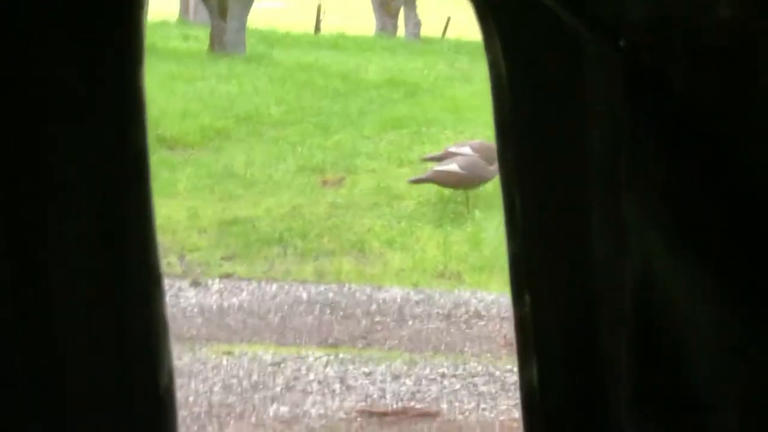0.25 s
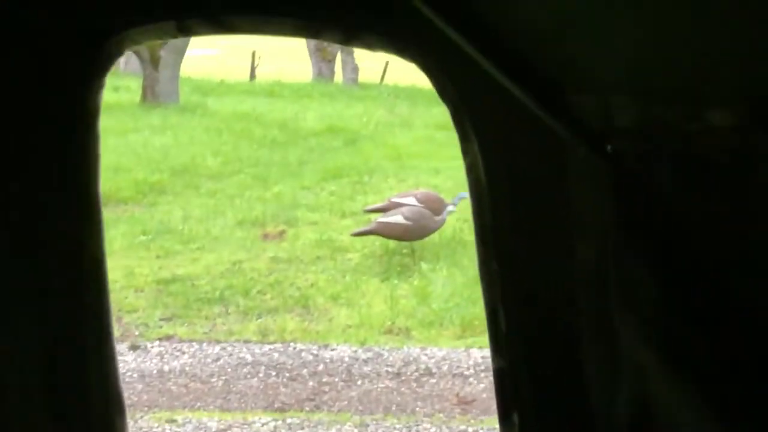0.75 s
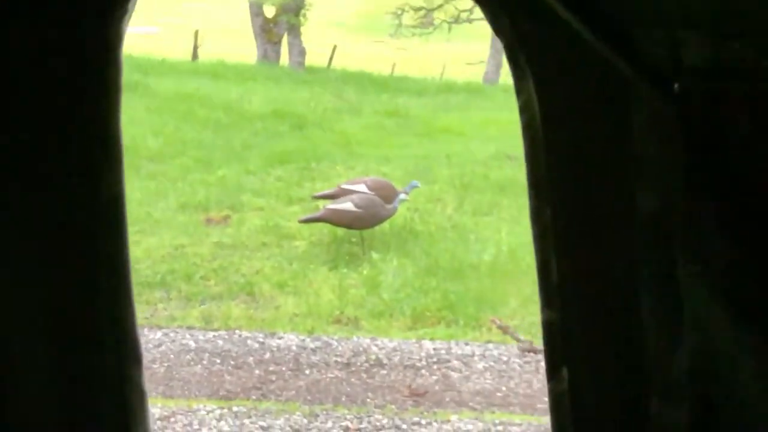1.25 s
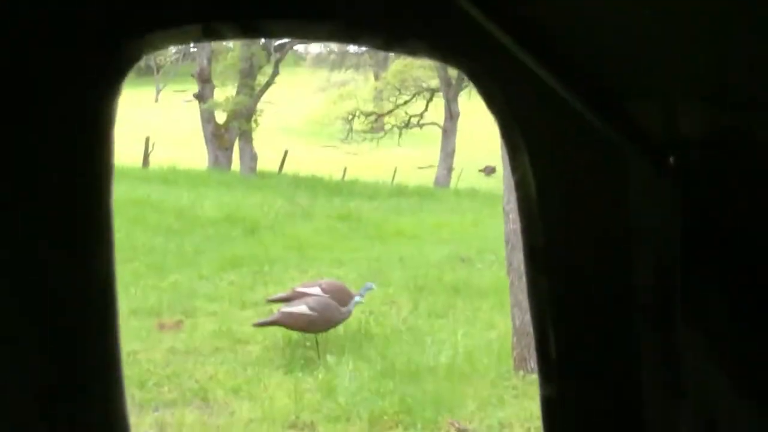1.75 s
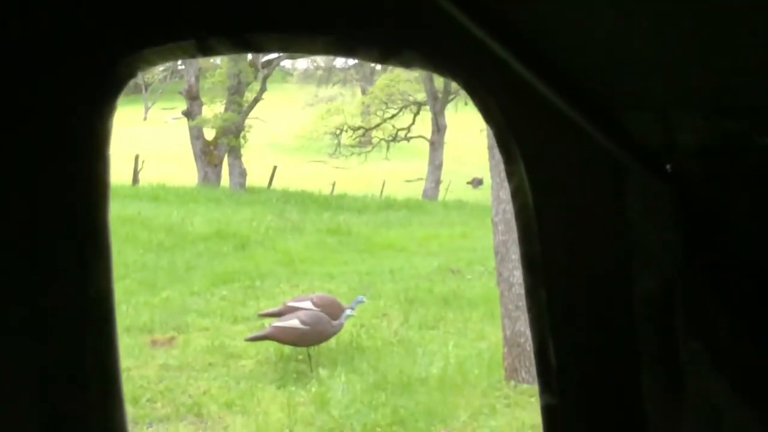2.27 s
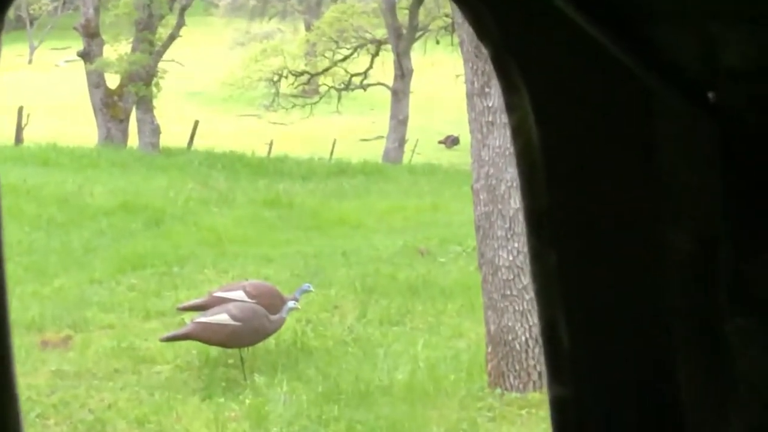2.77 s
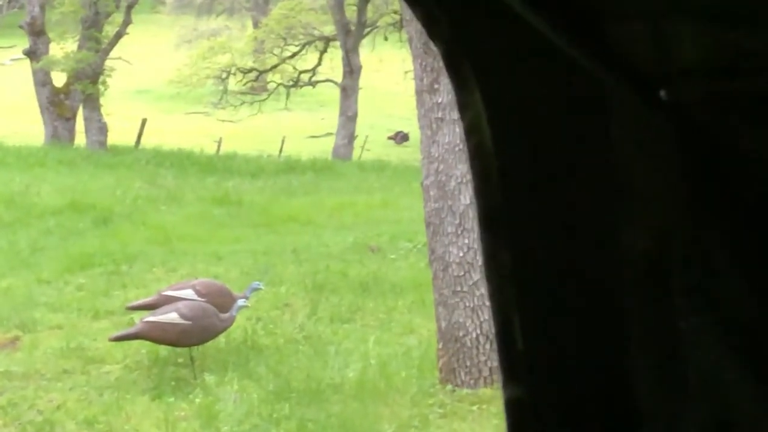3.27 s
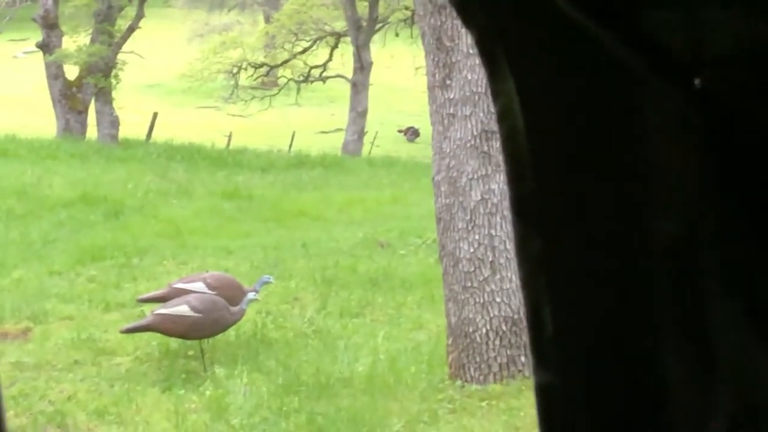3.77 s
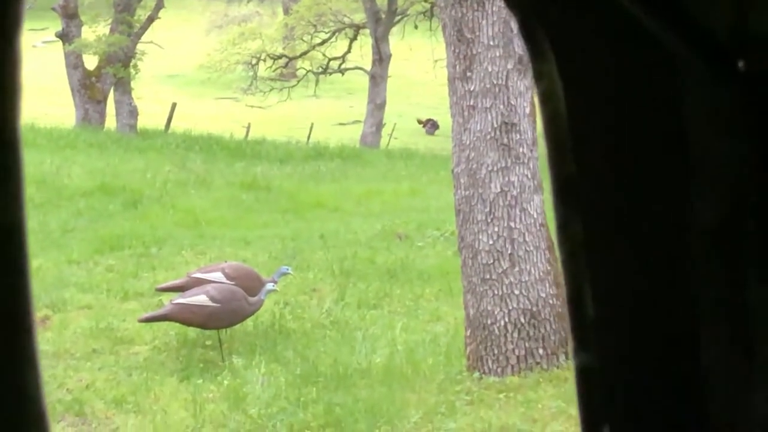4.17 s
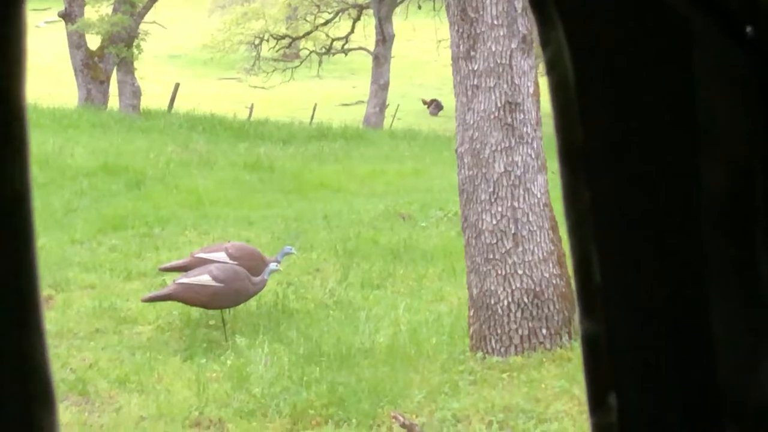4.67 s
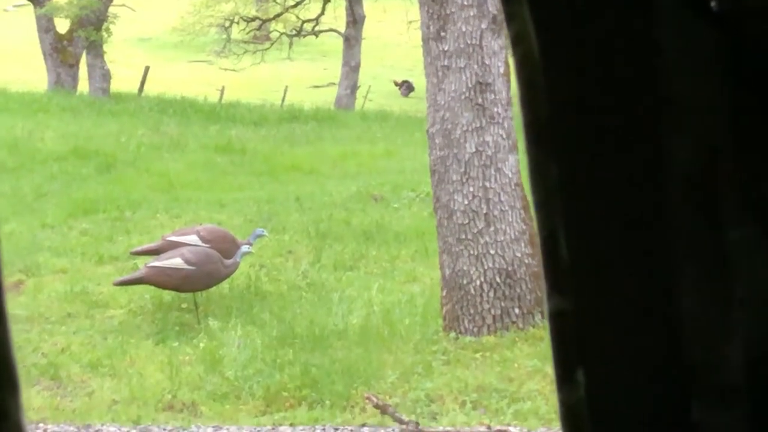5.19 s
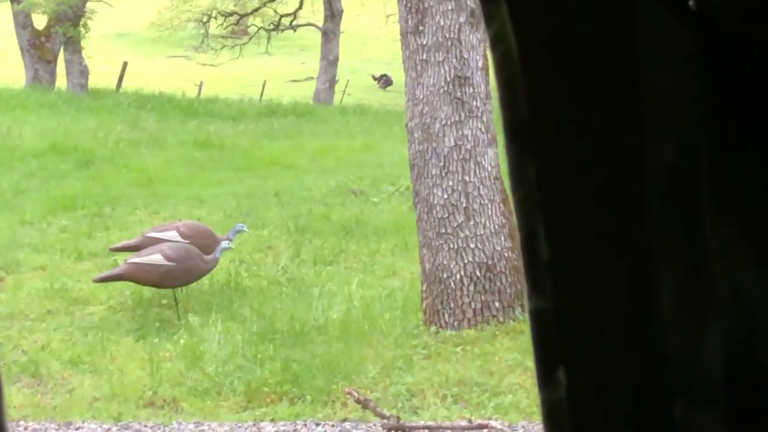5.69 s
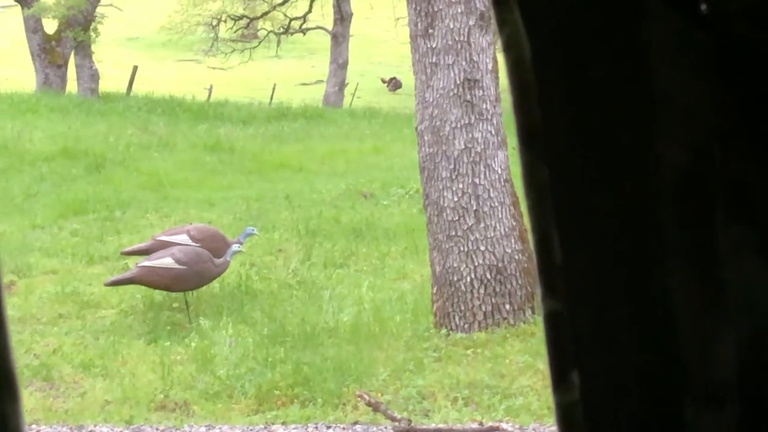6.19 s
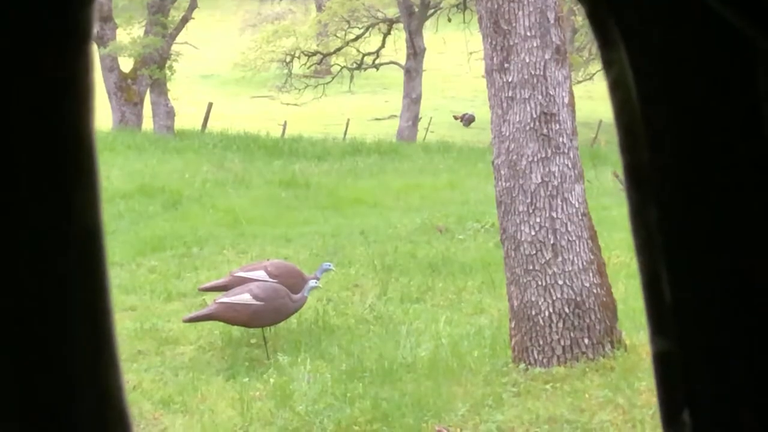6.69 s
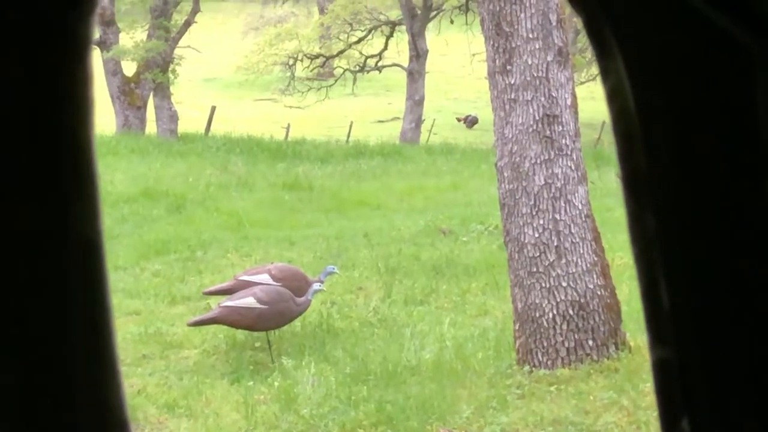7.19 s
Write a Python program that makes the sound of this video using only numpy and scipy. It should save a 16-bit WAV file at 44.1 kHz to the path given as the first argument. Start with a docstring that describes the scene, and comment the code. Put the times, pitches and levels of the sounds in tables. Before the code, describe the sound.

A steady low rumble, like a far engine, and a soft hush of air fill a grassy field heard from inside a cloth blind. After a quick songbird trill, a nearby turkey clucks once, loudly, with a slight echo, then makes brief dry rattles at uneven intervals. Small taps and fabric scuffs come close to the microphone, while faint birds slur, whistle and buzz, ending in a far twitter.

```python
"""A wild turkey in an oak pasture, heard from inside a fabric blind. Droning rumble and air hiss throughout.
A songbird trills first; small knocks and high chips follow. At 0.55 s the turkey clucks once, loudly:
syrinx pulses ring its throat. Far birds slur and whistle, and the trees scatter the calls back.
From 1.3 s the turkey gives short dry rattles, a flutter slapping a hollow ring. Cloth scuffs near 2 s.
Hoarse bird notes start at 4 s; a far twitter swells near 6 s."""
import sys
import numpy as np
from scipy import signal
from scipy.fft import rfft, irfft
from scipy.io import wavfile
from scipy.ndimage import uniform_filter1d

SR = 44100
rng = np.random.default_rng(int(sys.argv[2]) if len(sys.argv) > 2 else 0)


def inscribe(sig):
    """Save sig as 16-bit PCM at rate SR to the path in sys.argv[1].

    A 1-D sig is mono; a 2-D sig holds one channel per row.
    Samples are clipped to [-1, 1] before scaling.
    """
    pcm = np.round(np.clip(np.atleast_2d(sig).T, -1, 1) * 32767)
    wavfile.write(sys.argv[1], SR, pcm.astype(np.int16))


N = 328104
T = np.arange(N) / SR

# rumble spectrum: f/Hz, gain/dB
RUMBLE_EQ = [(20, -38.5), (30, -40.5), (42, -6), (54, -3), (72, 2.5), (100, -0.5), (130, -2), (165, -12),
             (200, -24), (300, -61.5)]
# rumble surges: t/s, rise/dB
RUMBLE_SURGES = [(.815, 9.5), (2.05, 8.5), (4.72, 6), (5.615, 7)]
# spectra of air hush, wind and grass: f/Hz, gain/dB
HUSH_EQ = [(100, -20), (170, -3), (294, -7.5), (446, -10), (509, -10.5), (627, -13), (689, -14.5),
           (801, -15), (1680, -21), (2590, -23), (2950, -24), (3640, -24), (4150, -25.5), (8850, -30),
           (15600, -33)]
WIND_EQ = [(90, -18), (190, -3.5), (480, -8.5), (900, -15.5), (2500, -37), (8000, -60.5)]
GRASS_EQ = [(300, 1.5), (1500, 2.5), (4500, 5.5), (8000, -3.5), (15000, -11)]
# gusts in the grass: t/s, half width/s, level/dB
GRASS_GUSTS = [(1.346, 0.45, -50), (3.905, 0.29, -56), (4.8, .2, -66)]
# one trill syllable: t/s from its start, f/Hz, gain/dB
TRILL_SYLLABLE = [(0, 6090, -19.5), (.007, 5160, -3.5), (.011, 4670, 0.5), (.019, 4060, -4.5),
                  (.027, 4320, 0), (.033, 4820, 0), (.039, 4520, -5), (.044, 4300, -28)]
# close knocks: t/s, level/dB, f/Hz, damping/(1/s)
KNOCK_RINGS = [(.23, -21, 260, 260), (1.1055, -17.5, 5000, 2600), (1.106, -28, 2260, 895),
               (1.107, -30, 420, 300), (2.258, -25.5, 178.2, 70), (2.334, -30, 157.6, 70),
               (5.073, -33, 350, 250), (5.098, -24.5, 590, 300)]
# high bird chips: t/s
CHIP_TIMES_S = [.39, .62, .84, 1.54, 1.61, 2.52, 3.39, 3.61, 4.43, 4.82]
# turkey throat resonances: f/Hz, width/Hz, gain/dB
THROAT_MODES = [(1367, 91, 4.5), (1500, 85, 2), (1867, 94, -2)]
# cluck passband: f/Hz, gain/dB
CLUCK_EQ = [(300, -34), (1080, -24), (1240, -0.5), (1500, 5), (1900, 2), (2020, -27), (2450, -3.5),
            (3000, -9), (3500, -4.5), (6000, -18), (12000, -25)]
# falling slurs: t/s, length/s, start f/Hz, level/dB
SLUR_NOTES = [(0.58, 0.0677, 6330, -51), (.694, 0.067, 6670, -49.5), (.824, 0.07, 6600, -47),
              (0.933, .11, 7505, -43), (1.078, .105, 7450, -46), (1.28, .11, 7060, -49),
              (1.442, .11, 7254, -46)]
# turkey rattles: t/s, length/s, level/dB, tilt/(dB/octave)
RATTLE_BURSTS = [(1.298, 0.016, -33, -5), (1.382, 0.019, -35, -3.5), (1.454, 0.0198, -37, -3),
                 (1.541, 0.018, -38.5, -2.5), (1.66, 0.019, -37, -4), (2.878, 0.0262, -33, -1),
                 (3.888, 0.019, -31.5, -2), (4.003, 0.0142, -46.5, 4.5), (4.132, 0.0213, -39.5, -1.5),
                 (4.718, 0.015, -33, -3)]
# rattle spectrum: f/Hz, gain/dB
RATTLE_EQ = [(200, -7), (450, 0), (700, 0), (880, -13.5), (1070, 3.5), (1220, -3.5), (1550, 0.5),
             (2000, -8.5), (2750, -7), (3100, -11.5), (4000, -11.5), (6000, -16), (12000, -37)]
# arched whistles: t/s, length/s, start f/Hz, end f/Hz, level/dB, crescendo/dB
WHISTLE_NOTES = [(1.705, 0.0915, 3190, 5017, -47.5, 1), (1.775, 0.095, 5150, 4250, -49.5, -2),
                 (2.785, 0.085, 4980, 4550, -50.5, 0), (2.918, .11, 4950, 3740, -52, 3),
                 (3.025, .095, 3720, 3620, -54.5, -6), (3.353, .084, 3800, 4580, -48.5, 8),
                 (3.583, .082, 3910, 4490, -47.5, 8), (3.763, .078, 3920, 4510, -45.8, 8),
                 (5.039, .1, 6408, 5520, -43.5, 18), (5.299, .08, 3000, 3170, -51.5, 0),
                 (5.321, 0.0287, 4530, 4400, -51, 0), (5.73, 0.0556, 3700, 4180, -47, 3)]
# fabric scuffs: t/s, level/dB, fade/s, tilt/(dB/octave)
CLOTH_SLIPS = [(1.982, -40.5, 0.0088, 7.5), (2.152, -45, .008, 6), (2.257, -31, 0.00186, -1),
               (2.331, -30.5, 0.00345, -3)]
# scuff spectrum: f/Hz, gain/dB
CLOTH_EQ = [(100, -8), (250, 0), (700, -5), (2000, -11), (4500, -14.5), (12000, -32)]
# hoarse notes: t/s, length/s, lowest f/Hz, level/dB
BUZZ_NOTES = [(4.003, 0.036, 3880, -45), (4.075, 0.0193, 3130, -47.5), (4.165, .042, 3977, -43.5),
              (4.335, 0.0367, 3910, -44), (4.497, 0.0514, 3610, -48), (4.627, .036, 3844, -44.5),
              (4.799, 0.188, 3370, -54.5), (5.865, 0.039, 5790, -47.5)]
# far chorus envelope, end values held: t/s, level/dB
TWITTER_LEVELS = [(5.35, -70.5), (5.5, -62), (5.8, -56), (6.05, -54.5), (6.25, -56.5), (6.5, -78)]


def undb(db):
    """Decibels to gain."""
    return 10 ** (np.asarray(db) / 20)


def unit(x):
    """Scale to rms 1."""
    return x / np.sqrt(np.mean(x ** 2))


def curves(rows, t=T):
    """Table columns, interpolated linearly in time."""
    times_s, *columns = np.transpose(rows)
    return [np.interp(t, times_s, c) for c in columns]


def add(out, at_s, x):
    """Mix x in at at_s."""
    start = max(int(at_s * SR), 0)
    out[start:start + len(x)] += x[:N - start]


def bump(at_s, half_width_s):
    """Gaussian of height 1."""
    return np.exp(-((T - at_s) / half_width_s) ** 2)


def wander(rate_hz, size=N):
    """Smooth random drift, rms 1."""
    step = max(int(SR / rate_hz), 1)
    held = np.repeat(rng.standard_normal(size // step + 2), step)
    return unit(uniform_filter1d(held, step))[:size]


def colour(x, eq, tilt_db_per_oct=0):
    """Apply a spectrum, tilted about 1 kHz."""
    octave = np.log2(np.maximum(np.arange(len(x) // 2 + 1) * SR / len(x), 1))
    hz, db = np.transpose(eq)
    tilt_db = tilt_db_per_oct * (octave - np.log2(1000))
    return irfft(rfft(x) * undb(np.interp(octave, np.log2(hz), db) + tilt_db), len(x))


def noise(eq, tilt_db_per_oct=0, size=N):
    """Coloured noise, rms 1."""
    return unit(colour(rng.standard_normal(size), eq, tilt_db_per_oct))


def resonate(x, hz, width_hz):
    """Damped resonance, gain 1 at centre."""
    return signal.lfilter(*signal.iirpeak(hz, hz / width_hz, fs=SR), x)


def trees(x, t60_s, wet_db, build_s):
    """Trunks and crowns return a late, fading scatter of echoes."""
    t = T[:SR]
    scatter = rng.standard_normal(SR) * undb(3.5 * wander(121, SR))
    echo = scatter * undb(-60 * t / t60_s) * np.minimum(t / build_s, 1) ** 2
    return x + undb(wet_db) * signal.fftconvolve(x, echo / np.linalg.norm(echo))[:N]


def foliage(x, fade_s, direct):
    """Leaves and ground blur a far call over many close paths."""
    t = T[:SR // 12]
    paths = rng.standard_normal(len(t)) * np.exp(-t / fade_s)
    blurred = signal.fftconvolve(x, paths / np.linalg.norm(paths))[:N]
    return (direct * x + blurred) / np.hypot(direct, 1)


def bird_tone(hz, rms, waver):
    """Sine along a pitch path; fast pitch waver makes it buzzy."""
    wavering_hz = hz * (1 + waver * wander(600, len(hz)))
    return np.sqrt(2) * rms * np.sin(2 * np.pi * np.cumsum(wavering_hz) / SR)


def bird_note(hz, db, waver, flicker_db=3):
    """A bird tone that swells, flickers and fades."""
    u = np.linspace(0, 1, len(hz))
    swell = np.abs(np.sin(np.pi * u ** 1.13)) ** .32
    return bird_tone(hz, swell * undb(db + flicker_db * wander(108, len(u))), waver)


def rumble(level_db=-32.5, drone_hz=90.68, drone_db=-5, under_hz=73, under_db=-11, throb_db=1.06):
    """Low noise and two wavering drones, as of a far engine; random throb, brief surges."""
    bed = noise(RUMBLE_EQ)
    for hz, db in (drone_hz, drone_db), (under_hz, under_db):
        cycles = np.cumsum(hz * (1 + .01386 * wander(6))) / SR
        bed += undb(db) * unit(np.sin(2 * np.pi * cycles) * undb(6 * wander(3.08)))
    steady = bed / np.sqrt(uniform_filter1d(bed ** 2, SR // 4))
    surge_db = sum(db * bump(at_s, half_width_s=.018) for at_s, db in RUMBLE_SURGES)
    return steady * undb(level_db + throb_db * wander(14) + surge_db)


def air(hush_db=-43, wind_db=-47, calm_grass_db=-68):
    """Open-air hush, restless low wind, grass hiss that follows the gusts."""
    hush = noise(HUSH_EQ) * undb(hush_db + .55 * wander(3.07))
    wind, grass = noise(WIND_EQ), noise(GRASS_EQ)
    gusts = sum(undb(db) * bump(at_s, half_width_s) for at_s, half_width_s, db in GRASS_GUSTS)
    wind *= undb(wind_db + 2.6 * wander(20))
    grass *= (undb(calm_grass_db) + gusts) * undb(2 * wander(24.77))
    return hush + wind + grass


def trill(at_s=.001, count=6, period_s=.0725, db=-34.5, sag_per_s=.18):
    """One bird repeats a dip-and-rise syllable, sinking slightly in pitch."""
    out = np.zeros(N)
    hz, shape_db = curves(TRILL_SYLLABLE, T[:int(TRILL_SYLLABLE[-1][0] * SR)])
    for elapsed_s in period_s * np.arange(count):
        pitch_ratio = 1.02 - sag_per_s * elapsed_s
        add(out, at_s + elapsed_s, bird_tone(hz * pitch_ratio, undb(db + shape_db), waver=.016))
    return trees(foliage(out, fade_s=.012, direct=1.35), t60_s=.387, wet_db=-8.5, build_s=.0083)


def knocks():
    """Light taps, each a quickly damped ring."""
    out, t = np.zeros(N), T[:SR // 20]
    for at_s, db, hz, damping_per_s in KNOCK_RINGS:
        add(out, at_s, undb(db) * np.sin(2 * np.pi * hz * t) * np.exp(-damping_per_s * t))
    return trees(out, t60_s=.066, wet_db=-14.5, build_s=.00127)


def chips(hz=8850, db=-58, length_s=.065):
    """A small far bird: thin notes on one high pitch."""
    out, swell = np.zeros(N), np.hanning(int(length_s * SR))
    for at_s in CHIP_TIMES_S:
        add(out, at_s, bird_tone(np.full(len(swell), hz), swell * undb(db), waver=.015))
    return foliage(out, fade_s=.017, direct=.73)


def cluck(at_s=.5465, pulse_hz=123.54, jitter=.018, rasp=.074, peak_db=-18.5,
          attack_s=.00252, peak_s=.013, swell_db_per_s=300, fade_db_per_s=600):
    """Uneven syrinx pulses ring the turkey's throat; it swells as pressure builds, then dies."""
    out, t = np.zeros(N), T[:SR // 16]
    cycles = np.cumsum(pulse_hz * (1 + jitter * wander(200, len(t)))) / SR
    pulses = np.diff(np.floor(cycles), prepend=-1)
    breath = rasp * np.exp(-(cycles % 1) / .71) * rng.standard_normal(len(t))
    ring = sum(undb(db) * resonate(pulses + breath, hz, width_hz) for hz, width_hz, db in THROAT_MODES)
    # steady air pressure sustains the ring between pulses
    ring /= np.sqrt(uniform_filter1d(ring ** 2, SR // 220))
    drop_db = swell_db_per_s * np.maximum(peak_s - t, 0) + fade_db_per_s * np.maximum(t - peak_s, 0)
    envelope = undb(peak_db - drop_db) * np.minimum(t / attack_s, 1)
    add(out, at_s, unit(colour(ring, CLUCK_EQ)) * envelope)
    # the upper resonance carries best into the trees
    carried = .3 * out + resonate(out, hz=1744, width_hz=200)
    echo = trees(carried, t60_s=.75, wet_db=-13.5, build_s=.063) - carried
    return out + echo


def slurs(fall_hz_per_s=38000, floor_hz=3906):
    """One bird sweeps steeply down, always at the same rate."""
    out = np.zeros(N)
    for at_s, length_s, start_hz, db in SLUR_NOTES:
        hz = np.maximum(start_hz - fall_hz_per_s * T[:int(length_s * SR)], floor_hz)
        add(out, at_s, bird_note(hz, db, waver=.043))
    return foliage(out, fade_s=.0215, direct=.72)


def far_calls(count=9, centre_hz=3550, spread=.07, fall=.0494, length_s=.12, db=-61):
    """Faint, slightly falling calls from across the pasture, at random times."""
    out, u = np.zeros(N), np.linspace(0, 1, int(length_s * SR))
    for slot, (offset, pitch) in enumerate(rng.random((count, 2))):
        hz = centre_hz * (1 + spread * (2 * pitch - 1)) * (1 - fall * u)
        add(out, (slot + offset) / count * T[-1], bird_note(hz, db, waver=.0394))
    return foliage(out, fade_s=.036, direct=.31)


def rattles(flutter_hz=430, rasp=.1, rise_s=.0015, fade_s=.0049):
    """Toneless turkey notes: a fast, uneven flutter slaps a hollow ring as air rushes past."""
    out, t = np.zeros(N), T[:SR // 10]
    for at_s, length_s, db, tilt in RATTLE_BURSTS:
        cycles = np.cumsum(flutter_hz * (1 + .35 * wander(700, len(t)))) / SR
        slaps = np.diff(np.floor(cycles), prepend=-1)
        burst = colour(slaps + rasp * rng.standard_normal(len(t)), RATTLE_EQ, tilt)
        burst = burst - burst.mean() + 1.18 * resonate(burst, hz=1060, width_hz=102)
        # pressure sags, then shuts off
        decay = np.exp(-.6 * t / length_s - np.maximum(t - length_s, 0) / fade_s)
        burst *= np.minimum(t / rise_s, 1) * decay
        add(out, at_s, burst * undb(db) / np.std(burst[t < length_s]))
    return trees(out, t60_s=.27, wet_db=-17.5, build_s=.0064)


def whistles(arch=.0224):
    """Clear bird notes glide in a shallow arch, many growing louder."""
    out = np.zeros(N)
    for at_s, length_s, start_hz, end_hz, db, crescendo_db in WHISTLE_NOTES:
        u = np.linspace(0, 1, int(length_s * SR))
        hz = (start_hz + (end_hz - start_hz) * u) * (1 + arch * np.sin(np.pi * u))
        add(out, at_s, bird_note(hz, db + crescendo_db * (u - .5), waver=.016))
    return foliage(out, fade_s=.019, direct=1.2)


def scuffs():
    """The blind's cloth slips: noise puffs that die at once."""
    out, t = np.zeros(N), T[:SR // 16]
    for at_s, db, fade_s, tilt in CLOTH_SLIPS:
        add(out, at_s, noise(CLOTH_EQ, tilt, len(t)) * undb(db) * np.exp(-t / fade_s))
    return out


def buzzes(scoop=.12):
    """Hoarse bird notes dip and rise again."""
    out = np.zeros(N)
    for at_s, length_s, low_hz, db in BUZZ_NOTES:
        u = np.linspace(-1, 1, int(length_s * SR))
        add(out, at_s, bird_note(low_hz * (1 + scoop * u ** 2), db, waver=.047))
    return foliage(out, fade_s=.021, direct=.94)


def twitter(centre_hz=4500, spread=.12):
    """Far birds run quick notes together; mostly echo arrives."""
    hz = centre_hz * np.exp(spread * wander(160))
    song = bird_tone(hz, undb(2.8 * wander(30)), waver=.0115)
    chorus = unit(trees(song, t60_s=.42, wet_db=13, build_s=.036))
    return chorus * undb(curves(TWITTER_LEVELS)[0])


def scene():
    """All sources at one microphone."""
    turkey = cluck() + rattles()
    birds = trill()
    birds += trees(slurs() + whistles() + buzzes() + far_calls(), t60_s=.52, wet_db=-8.5, build_s=.033)
    birds += chips() + twitter()
    return (turkey + birds + knocks() + scuffs() + rumble() + air())[None]


def record(dry):
    """Steep low-pass."""
    cutoff_hz = 15750
    return signal.sosfilt(signal.ellip(10, .1, 80, cutoff_hz, fs=SR, output="sos"), dry)


dry = scene()
out = record(dry)
inscribe(out)
```